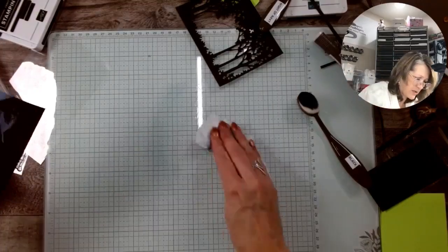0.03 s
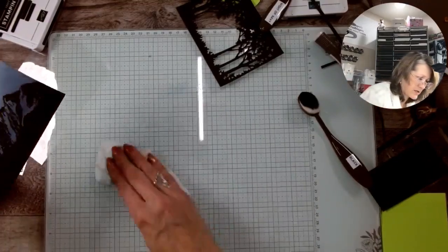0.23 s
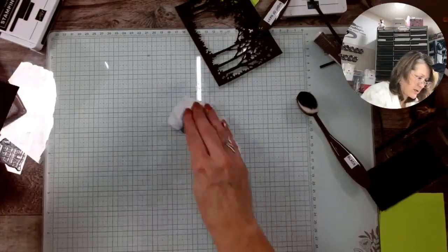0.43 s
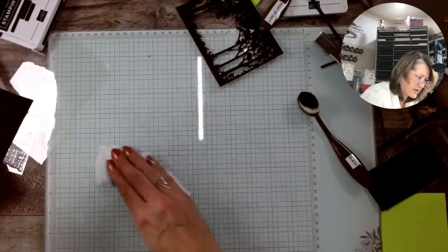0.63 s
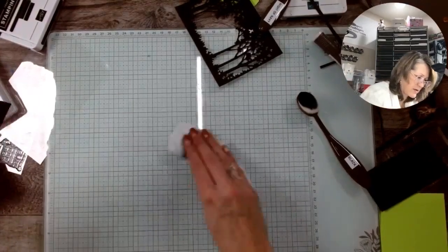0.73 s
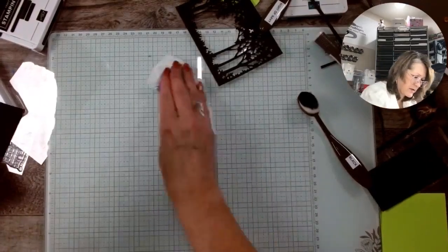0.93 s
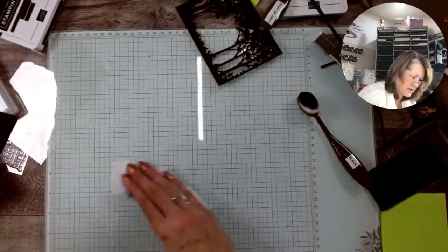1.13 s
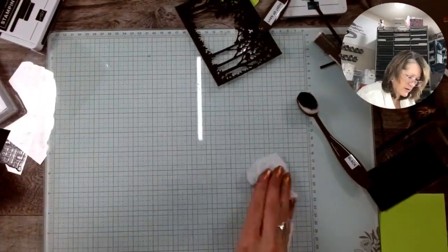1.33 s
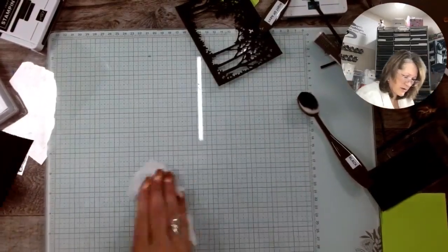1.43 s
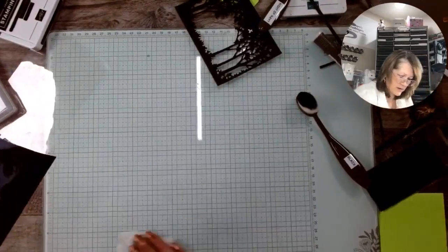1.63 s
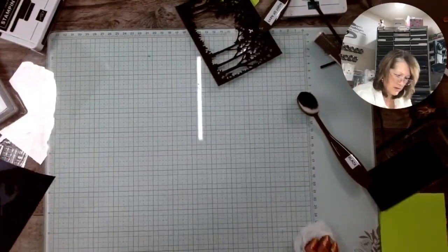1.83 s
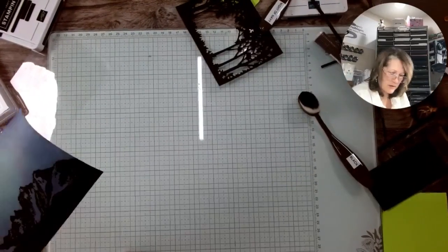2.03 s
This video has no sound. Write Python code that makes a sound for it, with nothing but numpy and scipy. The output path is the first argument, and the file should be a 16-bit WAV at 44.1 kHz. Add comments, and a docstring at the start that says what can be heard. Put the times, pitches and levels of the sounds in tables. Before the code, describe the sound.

Rapid, slightly raspy squeaks come from a wipe scrubbing a glass mat in a small room, close to the microphone. They overlap at first with soft cloth hiss and faint table bumps, then become more separate and weaker.

```python
"""Gliding, overlapping squeaks over a hiss: a wipe is rubbed hard back and forth on a glass mat.
Stick-slip friction under several fingertips makes the squeaks, each a harmonic series on its slip rate.
Where the hand turns, the slips lose their period and break into coarse chatter. Sliding fibres
make the hiss, the table thuds under the strokes, and a small room adds a short reverberation."""
import sys
import numpy as np
from scipy import signal
from scipy.fft import rfft, irfft, next_fast_len
from scipy.io import wavfile
from scipy.ndimage import uniform_filter1d, map_coordinates

SR = 44100
rng = np.random.default_rng(int(sys.argv[2]) if len(sys.argv) > 2 else 0)


def bounce(signal):
    """Save signal as a 16-bit WAV file at the path given by the first command-line argument."""
    frames = np.transpose(np.atleast_2d(signal))
    limited = np.clip(frames, -1, 1)
    pcm = np.round(limited * 32767).astype(np.int16)
    wavfile.write(sys.argv[1], SR, pcm)


N = 92610
TOP_HZ = 13400  # upper band limit


def amp(db):
    """Amplitude ratio of a level in decibels."""
    return 10 ** (np.asarray(db) / 20)


def unit(x):
    """Normalisation to rms 1."""
    return x / np.sqrt(np.mean(x ** 2) + 1e-20)


def along(points, hz):
    """Interpolation of (frequency, value) points on a logarithmic frequency axis."""
    f, v = np.transpose(points)
    return np.interp(np.log(hz + 1e-6), np.log(f), v)


def wobble(per_s, size):
    """Smooth random modulation: a spline through per_s Gaussian knots a second."""
    return map_coordinates(rng.standard_normal(6000), [np.arange(size) * per_s / SR], mode="mirror")


def filtered(x, response):
    """Linear filtering: the spectrum of x times a frequency response."""
    m = next_fast_len(len(x) + 8192)
    return irfft(rfft(x, m) * response(np.fft.rfftfreq(m, 1 / SR)), m)[:len(x)]


def noise(spectrum):
    """Spectral shaping of white noise, at rms 1."""
    return unit(filtered(rng.standard_normal(N), lambda hz: amp(along(spectrum, hz))))


def swell(peak_s, rise, fall):
    """Transient envelope: a Gaussian rise to 1 and a longer-tailed decay."""
    t = np.arange(N) / SR - peak_s
    return np.exp(-np.where(t < 0, (t / rise) ** 2, np.abs(t / fall) ** 1.26))


def band(shape, centre_hz, x, envelope):
    """Band-pass filtering of a burst of x, scaled to the energy of its envelope."""
    burst = filtered(x * envelope, lambda hz: amp(along(shape, hz / centre_hz)))
    return burst * np.linalg.norm(envelope) / np.linalg.norm(burst)


# Spectrum of the noise floor: (frequency [Hz], relative level [dB])
FLOOR_SPECTRUM = [(25, -38), (60, -19), (100, -12), (170, 1), (260, -2), (450, -14.5), (1000, -17),
                  (2000, -3.5), (3500, -29), (6000, -15.5), (7400, -19), (8200, -25.5), (9600, -10.5),
                  (11500, -20), (13200, -33)]

def noise_floor(level_db=-66.5):
    """Stationary coloured noise, faint beneath the scene."""
    return amp(level_db) * noise(FLOOR_SPECTRUM)


# Decay of the room: (frequency [Hz], reverberation time T60 [s])
ROOM_DECAY = [(150, 0.14), (1000, 0.12), (3000, 0.28), (10000, 0.073)]

def room(x, tail_db=-17, early_db=-7.5, early_s=.014):
    """Convolution with early reflections off near surfaces and an exponentially decaying diffuse tail."""
    hz, t, spectra = signal.stft(rng.standard_normal(SR // 2), SR, nperseg=256)
    decay = amp(-60 * t / along(ROOM_DECAY, hz)[:, None])
    tail = signal.istft(spectra * decay, SR, nperseg=256)[1]
    response = np.pad(amp(tail_db) * tail / np.linalg.norm(tail), (200, 0))
    delays = (early_s * SR * rng.uniform(.15, 1, 8)).astype(int)
    response[delays] += amp(early_db) * rng.choice([-1, 1], 8) / np.sqrt(8)
    return x + signal.fftconvolve(x, response)[:N]


# Shudders of the table: (peak time [s], level [dB], rise [s], fall [s], pitch [Hz])
TABLE_THUDS = [(0.276, -52, 0.017, 0.009, 283), (0.306, -41, 0.0081, 0.0087, 328),
               (0.339, -44.5, 0.009, 0.014, 177), (.355, -53.5, 0.014, 0.016, 72),
               (0.371, -48, .025, 0.024, 557), (0.453, -45.5, .017, 0.021, 195),
               (.47, -52, .015, 0.0074, 96), (.55, -61.5, .05, 0.046, 160),
               (0.701, -52.5, 0.0055, 0.017, 300), (.735, -54, 0.018, 0.018, 142),
               (.755, -61.5, .025, 0.02, 70), (1.001, -57, .012, 0.032, 162),
               (1.121, -58.5, 0.016, .012, 380), (1.148, -58.5, .02, 0.013, 172),
               (1.3, -58.5, .02, 0.018, 277), (1.344, -64, 0.045, .025, 180),
               (1.604, -58.5, 0.037, 0.046, 195), (1.857, -53.5, 0.026, 0.031, 198),
               (1.982, -40.5, 0.013, .011, 181.6), (2.013, -50.5, 0.029, 0.014, 178),
               (2.06, -55, 0.036, 0.015, 112)]
# Spectrum of a thud: (frequency / pitch [ratio], relative level [dB])
THUD_SPECTRUM = [(.1, -36), (.35, -26.5), (.65, -11), (1, 2), (1.5, -9.5), (2.5, -26), (6, -47.5),
                 (20, -79.5)]

def thud(peak_s, db, rise, fall, hz):
    """Forced vibration of mat and table under the hand: a short burst of low noise round one pitch."""
    return amp(db) * band(THUD_SPECTRUM, hz, rng.standard_normal(N), swell(peak_s, rise, fall))


# Course of the hiss, before its trim: (time [s], level [dB])
HISS_LEVELS = [(0.005, -46.5), (0.07, -57), (0.115, -38.5), (0.185, -46.5), (0.24, -47.5), (0.29, -52),
               (0.315, -45), (0.35, -44), (0.41, -49.5), (0.45, -47), (0.5, -52), (0.57, -42.5),
               (0.621, -49.5), (0.655, -78), (0.695, -45), (0.73, -56), (0.81, -54.5), (0.871, -41.5),
               (0.92, -56), (0.988, -46), (1.03, -64), (1.08, -74), (1.24, -81), (1.285, -58), (1.33, -71),
               (1.43, -73.5), (1.479, -65.5), (1.6, -68.5), (1.68, -68.5), (1.722, -60), (1.79, -64.8),
               (1.85, -66.5), (2.02, -79), (2.04, -62), (2.06, -77), (2.1, -65)]
# Spectrum of cloth sliding on glass: (frequency [Hz], relative level [dB])
CLOTH_SPECTRUM = [(60, -50), (300, -32), (700, -8.5), (1200, 0), (2500, 3), (4000, 3.5), (5800, 0),
                  (7200, -17.5), (10000, -20), (13000, -9)]

def hiss(trim_db=3, streak_db=6, flicker_db=1.9):
    """Friction noise: fibres drag over the glass in brief streaks of unequal pitch."""
    times, db = np.transpose(HISS_LEVELS)
    spectra = signal.stft(noise(CLOTH_SPECTRUM), nperseg=512)[2]
    streaks = uniform_filter1d(rng.standard_normal(spectra.shape), 3, axis=0)  # across frequency
    streaks = uniform_filter1d(streaks, 6, axis=1)  # along time
    drag = unit(signal.istft(spectra * amp(streak_db * unit(streaks)), nperseg=512)[1][:N])
    level_db = np.interp(np.arange(N) / SR, times, db) + trim_db
    return amp(level_db + flicker_db * wobble(300, N)) * drag


# Bursts of irregular slipping: (peak time [s], level [dB], rise [s], fall [s], centre [Hz])
CHATTER_BURSTS = [(.182, -35.5, 0.02, 0.037, 1840), (.314, -26.5, 0.014, 0.026, 1220),
                  (0.366, -42, 0.011, .05, 1830), (0.566, -35.5, 0.033, 0.04, 1600),
                  (.7, -30.5, 0.021, 0.026, 1554), (0.991, -30.5, 0.0099, 0.025, 1584),
                  (1.256, -37.5, 0.023, 0.032, 1490), (1.283, -28.5, 0.009, 0.011, 1760),
                  (1.491, -35.5, 0.013, 0.025, 1620), (1.747, -34.5, 0.015, 0.015, 1580),
                  (1.774, -31.5, 0.018, .024, 1510), (1.977, -45, 0.012, 0.014, 1650),
                  (2.045, -50, 0.0097, 0.0041, 1100), (2.098, -56, .012, .02, 2600)]
# Spectrum of the slips: (frequency / centre [ratio], relative level [dB])
SLIP_SPECTRUM = [(.03, -67), (.1, -41), (.25, -22.5), (.45, -13.5), (.7, -4.5), (1, -0.5), (1.4, 0.5),
                 (2, -16.5), (4, -42), (8, -59.5)]

def chatter(peak_s, db, rise, fall, centre_hz, slips_per_s=1100, scatter_db=4, damping_s=0.00099):
    """Aperiodic stick-slip: impulses of uneven size and spacing each excite a damped tick."""
    times = peak_s - .15 + np.cumsum(rng.uniform(.3, 1.7, 500)) / slips_per_s
    sizes = amp(scatter_db * rng.standard_normal(len(times)))
    slips = np.bincount(np.abs(times * SR).astype(int), sizes, N)[:N]
    t = np.arange(300) / SR
    tick = rng.standard_normal(len(t)) * np.exp(-t / damping_s)
    ticks = signal.fftconvolve(slips - slips.mean(), tick)[:N]
    return amp(db) * band(SLIP_SPECTRUM, centre_hz, ticks, swell(peak_s, rise, fall))


JITTER, RASP_DB, SHIMMER_DB = 0.051, -10.5, 9.5  # modulation depths at full roughness
JITTER_PER_S, RASP_PER_S, SHIMMER_PER_S = 640, 1100, 257.7
# Harmonics above the second weaken as the hand eases off: (squeak onset [s], gain [dB])
BRIGHTNESS = [(0, 1.5), (.6, 0.5), (1.05, 0.5), (1.25, -3), (1.5, -1), (2, -4.5)]
# Squeaks: (roughness [0-1], overtone roll-off [dB/octave], path). Points of a path:
# (time [s], slip rate [Hz], fundamental level [dB], second harmonic level before its trim [dB])
SQUEAK_GLIDES = [ (0.3, 0.33, [(0.026, 2318, -35, -73), (0.032, 2329, -32.5, -54),
                 (0.094, 2117, -28.5, -45.5), (0.1, 2018, -30, -57)]), (.15, 10, [(0.03, 1200, -42.5, -68),
                 (0.058, 1086, -64, -64), (0.086, 1061, -29, -32.5), (0.115, 1120, -34, -49)]),
                 (0.46, 7.1, [(0.1, 2094, -33, -47), (0.132, 1919, -28, -46.5), (0.15, 1793, -23, -48),
                 (0.174, 1846, -19.5, -47.5), (0.178, 1944, -32.5, -65), (0.195, 1872, -18, -62)]),
                 (0.14, 16.3, [(0.195, 1870, -31.5, -46), (0.217, 1796, -23, -39),
                 (0.227, 1707, -29.5, -40.5), (0.256, 1764, -31, -58)]), (0.04, 4.4, [(.25, 3570, -43, -75),
                 (.27, 3460, -43.5, -55), (.295, 3285, -33.5, -46), (.306, 3050, -36, -65)]),
                 (0.62, 20, [(.305, 2470, -31, -53), (.316, 2205, -27, -54), (.334, 2060, -38.5, -58)]),
                 (0.12, 19, [(.742, 3145, -45, -61), (.765, 3230, -42, -60), (.795, 3054, -46.5, -50)]),
                 (.12, 20, [(.45, 4890, -50.5, -69), (.485, 5380, -46, -69), (.52, 5900, -56, -71)]),
                 (0.32, 14, [(1.272, 1104, -41, -41), (1.284, 1441, -31.5, -45), (1.292, 1520, -53, -53)]),
                 (0.05, 22.5, [(.004, 1700, -43.5, -94), (.028, 1758, -45.5, -32)]),
                 (0.076, 33, [(.57, 3350, -61, -64), (.605, 3280, -66, -71), (.626, 3700, -44.5, -69),
                 (.637, 3220, -55, -75)]), (0.3, 18, [(.9, 3480, -63, -54), (.938, 3610, -48, -76),
                 (.95, 3100, -50, -62)]), (0.23, 3, [(1.742, 798, -52, -64), (1.755, 404, -50.5, -42),
                 (1.767, 355, -44, -48), (1.778, 493, -57.5, -35)]), (0.35, 0.5, [(0.17, 958, -39.5, -64),
                 (0.2, 1023, -45, -65), (0.214, 878, -41.5, -77), (0.24, 877, -57.5, -65)]),
                 (0.28, 11.8, [(0.255, 1507, -40, -66), (0.271, 1483, -35, -55), (0.285, 1586, -33, -68),
                 (0.295, 1350, -36, -63), (0.303, 1268, -24.5, -37), (0.321, 1132, -35.5, -38),
                 (0.343, 1280, -33, -40)]), (0.1, 17, [(0.355, 2164, -58, -63), (0.361, 2105, -32, -42),
                 (0.399, 2320, -33.5, -52), (0.413, 2340, -31, -45.5), (0.447, 2080, -35.5, -41.5)]),
                 (0.22, 4.6, [(0.4, 1211, -57, -77), (0.408, 1175, -36, -71), (0.462, 1059, -61.5, -58),
                 (0.52, 1221, -42, -64), (0.554, 1046, -42.5, -43), (0.588, 1150, -50, -79),
                 (0.6, 1098, -55, -55)]), (0.32, 17.2, [(0.448, 1710, -34.5, -51),
                 (0.466, 1728, -21.5, -45), (0.486, 1850, -37, -37), (0.518, 1980, -29, -44.5),
                 (0.552, 1919, -23, -47.5), (0.56, 1879, -25.5, -64), (0.572, 1644, -34, -41),
                 (0.588, 1670, -35, -41), (0.606, 1640, -33.5, -39.5), (0.635, 1842, -46, -71)]),
                 (0.22, 14, [(0.645, 2550, -58, -92), (0.669, 2690, -35, -55), (0.688, 2940, -44, -48)]),
                 (0.18, 27, [(0.665, 1142, -48, -86), (0.685, 1060, -36.5, -28), (0.701, 896, -27.5, -32),
                 (0.72, 951, -41, -28.5)]), (0.62, 9.8, [(0.72, 564.4, -38, -57),
                 (0.754, 577, -51.5, -47.5), (0.795, 630, -54.5, -59)]),
                 (0.072, 14.1, [(0.745, 1066, -70, -39), (0.759, 1084, -59, -47), (0.783, 1031, -55, -32),
                 (0.805, 1011, -48, -37), (0.845, 1017, -33.5, -37), (0.861, 872, -49, -49),
                 (0.885, 1061, -43.5, -35)]), (0.29, 21, [(0.852, 1690, -29, -33.5),
                 (0.87, 1850, -25.5, -43.5), (0.88, 1982, -26, -83), (0.9, 2340, -40, -73),
                 (0.91, 2480, -53, -59)]), (0.33, 7.7, [(0.928, 2196, -44, -74), (0.946, 2156, -34.5, -89),
                 (0.966, 2075, -29, -46.5), (0.994, 2098, -27, -84)]),
                 (0.43, 19, [(0.955, 1153, -43.5, -56), (0.973, 1362, -42, -70), (0.995, 1411, -24.5, -63),
                 (1.007, 1206, -34, -33), (1.028, 1145, -46.5, -55)]), (0.14, 22, [(1.025, 1676, -34, -81),
                 (1.035, 1722, -28, -43), (1.049, 1990, -30, -54), (1.058, 2050, -51, -84)]),
                 (0.19, 38, [(1.124, 1670, -43, -57), (1.14, 1743, -34, -61), (1.16, 1865, -42, -43),
                 (1.184, 1640, -38, -53.5), (1.2, 1420, -44.5, -52)]), (0.27, 46, [(1.192, 2103, -45, -64),
                 (1.218, 1727, -30.5, -43), (1.234, 1610, -37, -46), (1.243, 1580, -48, -61)]),
                 (0.13, 9, [(1.185, 747, -57, -57), (1.215, 744, -45, -75), (1.235, 495, -50.5, -71),
                 (1.261, 339, -40.5, -56), (1.272, 360, -46, -73)]), (.1, 20, [(1.388, 2500, -74, -81),
                 (1.408, 2700, -49.5, -87), (1.411, 2900, -80, -106)]),
                 (0.26, 23, [(1.447, 1874, -44.5, -76), (1.457, 1689, -34, -35.5), (1.465, 1519, -24, -31),
                 (1.475, 1370, -32.5, -36), (1.497, 1272, -38, -62)]),
                 (0.069, 9.9, [(1.522, 2035, -51, -65), (1.528, 1870, -32.5, -56),
                 (1.553, 2110, -36.5, -93)]), (0.031, 20, [(1.518, 4720, -45, -78),
                 (1.534, 4980, -36.5, -78), (1.55, 5047, -63, -83)]), (.25, 30, [(1.695, 2272, -41, -89),
                 (1.708, 2063, -39.5, -56), (1.717, 1825, -33.5, -38.5), (1.724, 1483, -32.5, -30),
                 (1.737, 1297, -42, -42), (1.75, 1010, -64, -47)]), (0.55, 30, [(1.77, 921, -42.5, -46),
                 (1.788, 1310, -33, -33.5), (1.805, 1745, -31.5, -53), (1.812, 1800, -29, -50)]),
                 (0.31, 14, [(1.952, 1532, -45, -78), (1.962, 1420, -38.5, -52), (1.97, 1255, -38, -48),
                 (1.98, 893, -46, -75)]), (0.93, 9.6, [(2.03, 1610, -54, -64), (2.042, 1603, -49, -63.5),
                 (2.052, 1540, -74, -83)]), (0.14, 20, [(2.074, 2853, -49.5, -54.5),
                 (2.092, 3046, -40, -74), (2.1, 3020, -42, -73)]), ]

def squeak(roughness, rolloff_db, path, overtone_trim_db=-1.5, wander_db=4.5, edge_s=.004):
    """Periodic stick-slip of one patch of cloth; roughness modulates its frequency and amplitude."""
    times, slip_hz, db, second_db = np.transpose(path)
    start_s, end_s = times[0] - edge_s, times[-1] + edge_s
    first, last = max(0, int(start_s * SR)), min(N, int(end_s * SR))
    t = np.arange(first, last) / SR
    n = len(t)

    def rasp():
        """Fast amplitude modulation puts sidebands round a partial."""
        return 1 + roughness * amp(RASP_DB) * wobble(RASP_PER_S, n)

    pitch = np.interp(t, times, slip_hz) * (1 + roughness * JITTER * wobble(JITTER_PER_S, n))
    phase = 2 * np.pi * np.cumsum(pitch) / SR
    wave = amp(np.interp(t, times, db)) * rasp() * np.sin(phase)
    overtone = amp(np.interp(t, times, second_db) + overtone_trim_db)
    bright_db = np.interp(times[0], *np.transpose(BRIGHTNESS))
    for k in range(2, 9):
        gain = amp((k > 2) * bright_db - rolloff_db * np.log2(k / 2))
        wander = unit(amp(wander_db * wobble(38.9, n)))
        wave += overtone * gain * wander * rasp() * (k * pitch < TOP_HZ) * np.sin(k * phase)
    shimmer = unit(amp(roughness * SHIMMER_DB * np.minimum(wobble(SHIMMER_PER_S, n), 1)))
    ramp = np.clip(np.minimum(t - start_s, end_s - t) / (2 * edge_s), 0, 1)
    fade = np.sin(ramp * np.pi / 2) ** 2
    return np.pad(np.sqrt(2) * wave * shimmer * fade, (first, N - last))


def scene():
    """Superposition of the friction sounds and the table's thuds in the room."""
    squeaks = sum(squeak(*row) for row in SQUEAK_GLIDES)
    chatters = sum(chatter(*row) for row in CHATTER_BURSTS)
    rubbing = squeaks + chatters + hiss()
    thuds = sum(thud(*row) for row in TABLE_THUDS)
    return room(rubbing + thuds)[None]


# Response of a desk microphone, with a dip in the treble: (frequency [Hz], gain [dB])
MICROPHONE_RESPONSE = [(25, -14), (45, -5), (62, 4), (7000, 0), (7600, -3), (8200, -16.5), (9000, 0.5),
                       (10000, -5), (12000, -18), (13300, -37)]

def record(dry):
    """Transduction: the microphone colours the sound, a noise floor adds to it, and the band is limited."""
    heard = filtered(dry[0], lambda hz: amp(along(MICROPHONE_RESPONSE, hz))) + noise_floor()
    return filtered(heard, lambda hz: hz < TOP_HZ)[None]


dry = scene()
out = record(dry)
bounce(out)
```